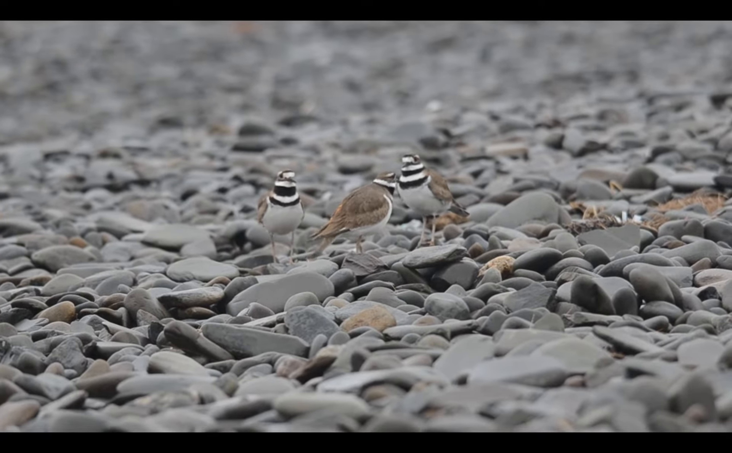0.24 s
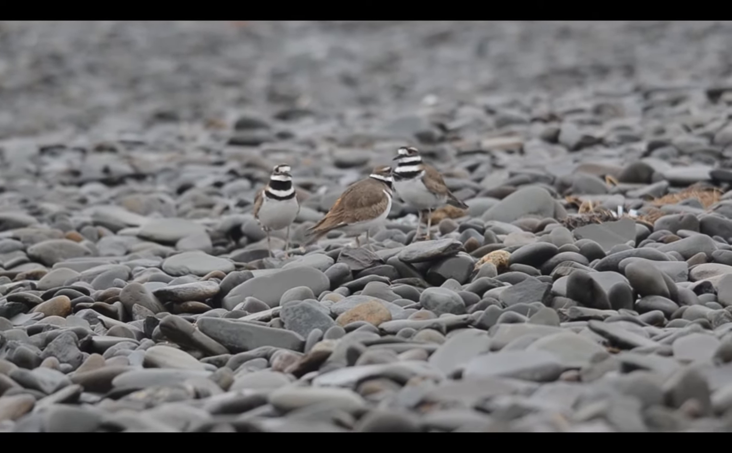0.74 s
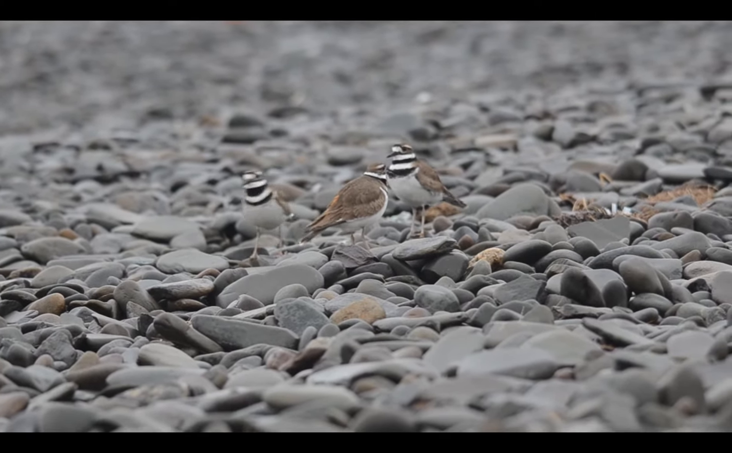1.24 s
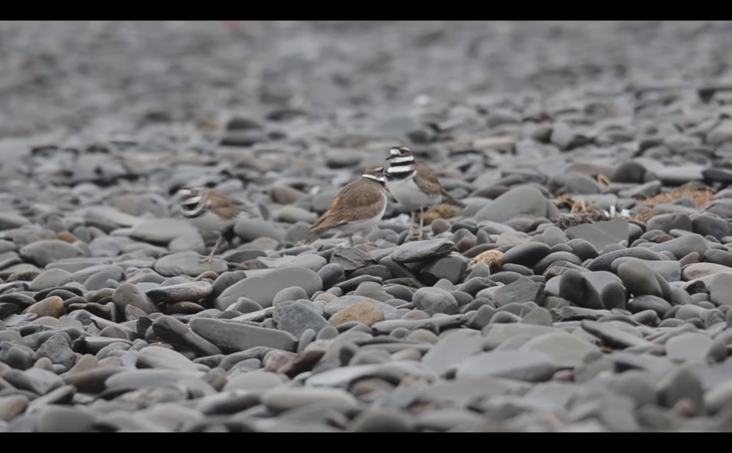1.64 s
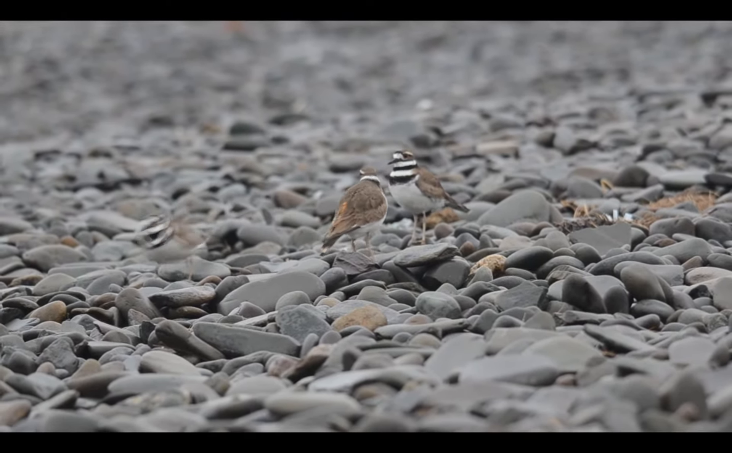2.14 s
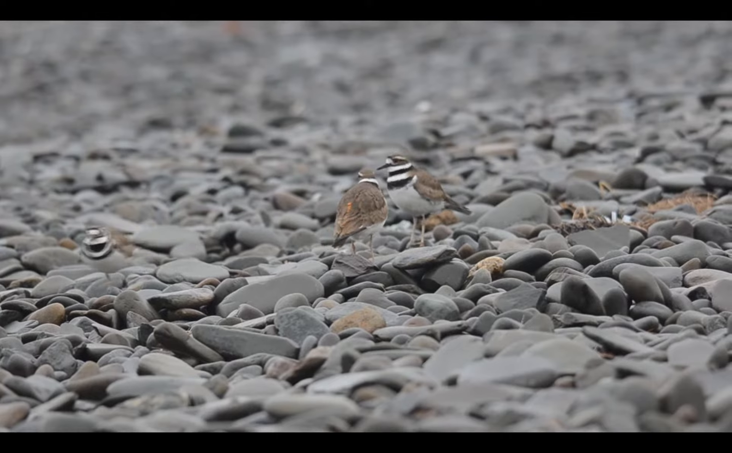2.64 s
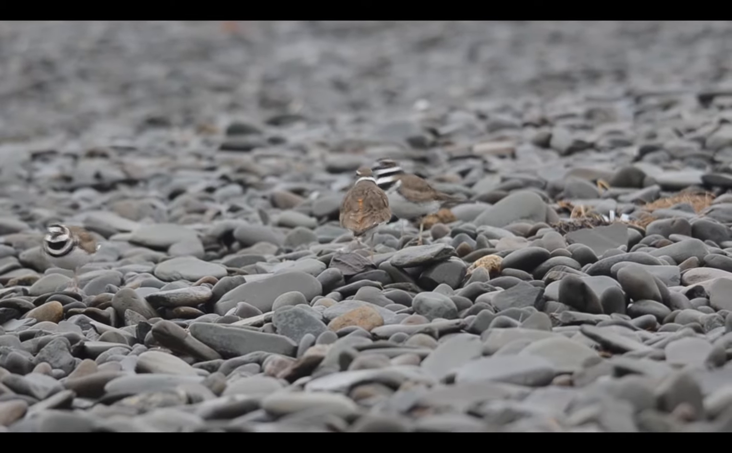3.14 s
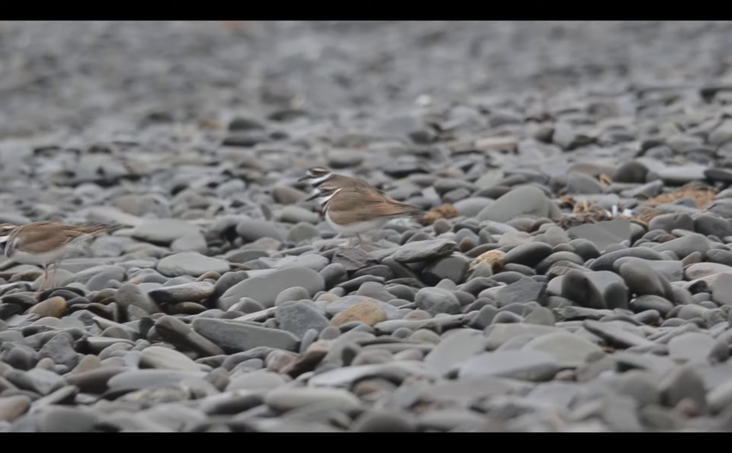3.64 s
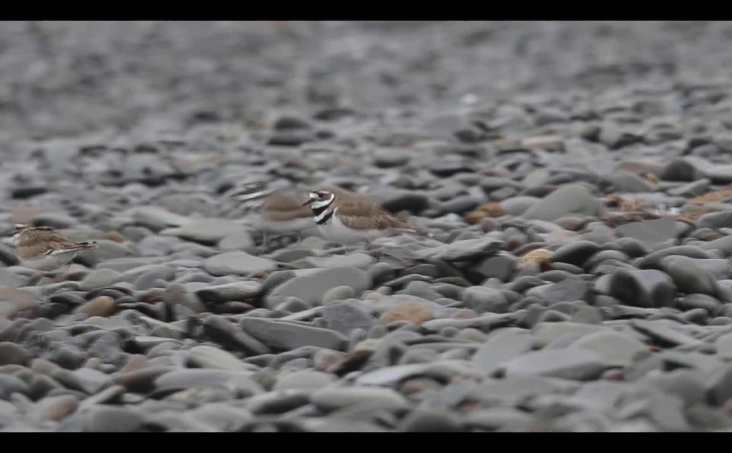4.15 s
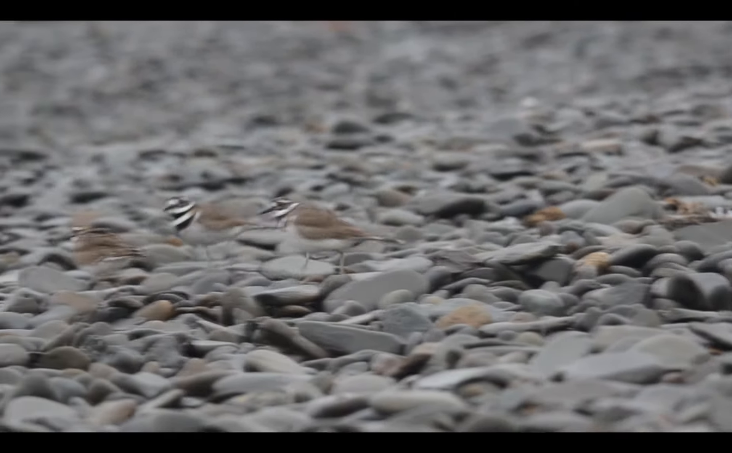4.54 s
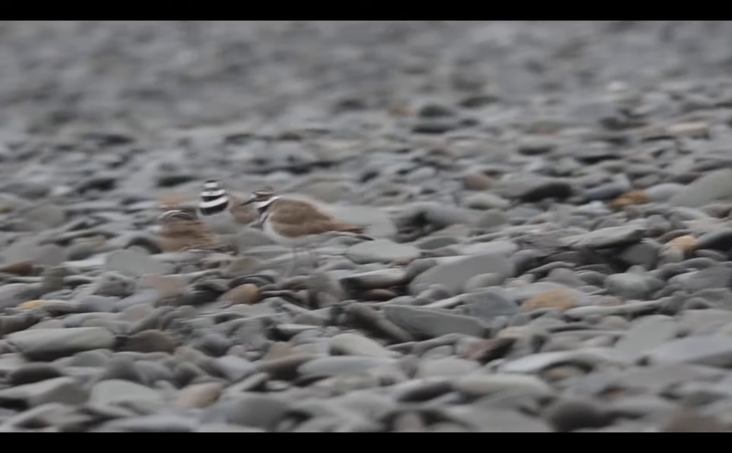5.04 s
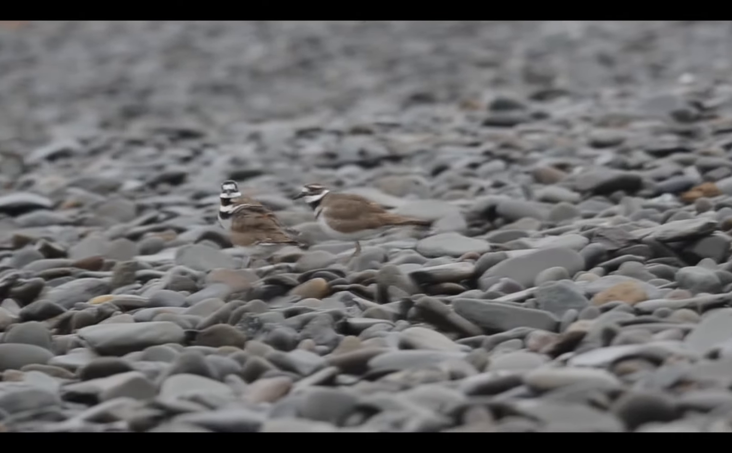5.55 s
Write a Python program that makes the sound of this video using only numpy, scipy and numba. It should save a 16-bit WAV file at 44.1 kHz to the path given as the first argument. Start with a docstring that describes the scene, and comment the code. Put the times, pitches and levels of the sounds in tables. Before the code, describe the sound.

Quick high peeps from several small shorebirds overlap in the open air of a stony beach, with almost no echo. A thin drawn whistle opens, and a few more follow among the short notes, which then settle into a busy, steady piping. Wind puffs and thumps right on the microphone, eases in the middle and returns more strongly. Distant surf hisses softly throughout.

```python
"""Plovers on a shingle beach

Three plovers pipe short arched notes over each other, and now and then a long drawn whistle.
The syrinx sounds its second partial loudest and at times falls into patterns of several cycles.
The stones scatter a short tail after each call. Right at the microphone gusts thump on the
diaphragm, and far off lies an even hiss of surf."""
import sys
import numpy as np
from scipy import signal
from scipy.io import wavfile
from scipy.ndimage import uniform_filter1d
from numba import njit

SR = 44100
rng = np.random.default_rng(int(sys.argv[2]) if len(sys.argv) > 2 else 0)


def to_wav(s):
    """Save 16-bit WAV."""
    ch = np.atleast_2d(s).T  # columns
    pcm = np.round(np.clip(ch, -1, 1) * 32767)  # PCM
    wavfile.write(sys.argv[1], SR, pcm.astype(np.int16))


N = 254898


def undb(db):
    """Decibels to gain."""
    return 10 ** (np.asarray(db) / 20)


def unit(x):
    """Scale to rms 1."""
    return x / np.sqrt(np.mean(x ** 2))


@njit
def moving_lowpass(x, hz, damping):
    """State-variable low-pass whose cutoff moves sample by sample."""
    out, band_state, low_state = np.empty(len(x)), 0., 0.
    for i in range(len(x)):
        g = np.tan(np.pi * hz[i] / SR)
        v = (band_state + g * (x[i] - low_state)) / (1 + g * (g + damping))
        out[i] = low_state + g * v
        band_state, low_state = 2 * v - band_state, low_state + 2 * g * v
    return out


def band(x, hz, width_hz):
    """Band-pass, gain 1 at the centre."""
    return signal.lfilter(*signal.iirpeak(hz, hz / width_hz, SR), x)


def spectrum_db(hz, table):
    """Level of a (frequency, level) table at hz, on a log frequency axis."""
    table_hz, table_db = np.transpose(table)
    return np.interp(np.log(hz), np.log(table_hz), table_db)


def walk(rate):
    """Random levels held 1 / rate s and slewed twice; spread near 1."""
    hold = int(SR / rate)
    steps = np.repeat(rng.standard_normal(N // hold + 1), hold)
    return 1.21 * uniform_filter1d(uniform_filter1d(steps, hold), hold)[:N]


def flutter(count, rough):
    """Gain of one line: steady at roughness 0, a quick random flutter that smears it at 1."""
    knots = rng.standard_normal(count // 60 + 2)
    noise = np.interp(np.arange(count) / 60, np.arange(len(knots)), knots)
    return np.sqrt(1 - rough ** 2) + rough * noise


def add(out, start_s, sound):
    """Mix a sound in at a time."""
    i = int(start_s * SR)
    out[i:i + len(sound)] += sound[:len(out) - i]


# the surf from far off: (frequency [Hz], relative level per Hz [dB])
SURF_SPECTRUM = [(15, -38), (25, 13.5), (183, -16.5), (253, 2), (322, -15), (482, 0), (582, -11),
                 (666, -14.5), (1050, -6), (2490, -15.5), (3530, -26), (6380, -29.5), (15500, -53.5)]


def surf(rms_db=-55.5):
    """Half-octave bands of distant wash that swell a little together and flicker alone."""
    out, swell = 0, walk(0.16)
    for hz in 25 * 2 ** np.arange(0, 9.4, .5):
        db = spectrum_db(hz, SURF_SPECTRUM) + 0.72 * swell + 1.34 * walk(5.2)
        wash = band(band(rng.standard_normal(N), hz, hz / 2), hz, hz / 2)
        out = out + undb(db) * wash
    return unit(out) * undb(rms_db)


# puffs on the microphone: (time of peak [s], breadth [s], level [dB])
GUSTS = [(0.057, 0.036, -39.5), (0.107, 0.028, -35), (0.248, 0.024, -49), (0.473, 0.01, -27),
         (0.496, 0.036, -34.5), (0.6, 0.024, -34), (0.655, 0.01, -34.5), (0.756, .021, -41.5),
         (0.811, .01, -36), (0.857, 0.014, -40), (0.893, 0.0077, -29.5), (1.035, 0.029, -34),
         (1.074, 0.013, -36.5), (1.15, 0.023, -41.5), (1.198, 0.018, -31.5), (1.449, 0.0055, -22.5),
         (1.526, .076, -33.5), (1.573, 0.032, -26), (1.634, .02, -31.5), (1.731, 0.027, -25),
         (1.793, .041, -30), (1.904, 0.026, -28), (2.054, 0.017, -38), (2.257, 0.082, -40.5),
         (2.487, 0.079, -46), (2.572, 0.026, -41.5), (3.233, 0.03, -47), (3.669, 0.018, -44.5),
         (3.913, 0.0075, -26), (3.979, 0.031, -20), (4.061, 0.022, -27), (4.105, 0.027, -25.5),
         (4.208, 0.031, -33), (4.379, 0.051, -40.5), (4.504, 0.02, -25), (4.545, 0.022, -27.5),
         (4.669, 0.056, -38.5), (4.755, 0.016, -38.5), (4.918, 0.022, -26.5), (4.976, 0.024, -32.5),
         (5.15, 0.027, -33), (5.236, 0.034, -29), (5.412, 0.041, -37.5), (5.526, 0.033, -33.5),
         (5.656, 0.068, -41)]
# the breeze under the puffs: (time [s], level [dB], brightness of the eddies [dB])
BREEZE = [(0, -49, -12.5), (.4, -63, -15.5), (.84, -47.5, -17.5), (1.1, -55, -13.5), (1.38, -54.5, -14.5),
          (1.57, -65, -1.5), (1.9, -61, -12.5), (2.6, -57.5, -11.5), (2.9, -67.5, -19), (3.3, -56, -18),
          (3.55, -66.5, -17.5), (3.85, -49.5, -18), (4.05, -56, -1.5), (4.35, -56, -17), (4.92, -60.5, -5),
          (5.1, -46.5, -18), (5.35, -43, -10), (5.78, -78, -25.5)]


def wind():
    """Eddies of uneven size push the diaphragm; in bright gusts they are smaller and reach higher."""
    t = np.arange(0, N / SR, .003)
    peak_s, breadth_s, gust_db = np.transpose(GUSTS)[:, :, None]
    gust_power = undb(2 * gust_db) * np.exp(-2 * ((t - peak_s) / breadth_s) ** 2)
    breeze_s, *columns = np.transpose(BREEZE)
    breeze_db, bright_db = (np.interp(t, breeze_s, c) for c in columns)
    power = gust_power.sum(axis=0) + undb(2 * breeze_db)
    bright_db = bright_db + .15 * (10 * np.log10(power) + 35)  # stronger puffs are brighter
    gain, bright_db = (np.interp(np.arange(N) / SR, t, c) for c in (np.sqrt(power), bright_db))
    gain = gain * undb(1.5 * walk(25))
    hz = np.clip(380 * undb(0.4292 * bright_db + 2.08 * walk(40)), 130, 620)
    # separate eddies, about one for each swing, over a weaker even flutter
    eddies = (rng.random(N) < hz / SR) * np.sqrt(SR / hz)
    push = rng.standard_normal(N) * (eddies + 0.31) * undb(2.0 * walk(60))
    rumble = moving_lowpass(push, hz, damping=1.0)
    rumble = moving_lowpass(rumble, 1.37 * hz, damping=1.77) / np.sqrt(hz)
    rumble = signal.sosfilt(signal.butter(2, 95, "high", fs=SR, output="sos"), rumble)
    # the eddies vary within a puff, while the puff sets their summed strength
    rumble = rumble / (uniform_filter1d(rumble ** 2, size=3000) + 1e-12) ** .4
    return .22 * np.tanh(unit(rumble) * gain / .22)  # the diaphragm stiffens against hard swings


# single hard eddies on the microphone: (time [s], signed peak push [full scale])
THUMPS = [(0.4746, -0.026), (1.0373, -0.064), (1.4497, -0.087), (1.5528, -0.15), (1.5754, 0.11),
          (1.7116, -0.083), (1.7384, 0.17), (1.8249, -0.097), (3.9571, -0.35), (3.9882, -0.19),
          (3.9951, 0.18), (4.1061, 0.06), (4.5007, -0.14), (4.918, -0.22), (5.2467, 0.0034)]


def thumps(base_hz=340, hz_per_push=260):
    """Each eddy is a pointed push with a counter-swing on both sides; harder ones swing faster."""
    out, t = np.zeros(N), np.arange(-.012, .012, 1 / SR)
    for s, push in THUMPS:
        swings = (base_hz + hz_per_push * abs(push)) * t
        envelope = np.exp(-(0.87 * swings) ** 2) / (1 + (4 * swings) ** 2) ** 0.76
        add(out, s + t[0], push * envelope * np.cos(2 * np.pi * 0.94 * swings))
    return out


def shingle(calls, t60_s=.07, tail_db=-20.5):
    """The stones of the beach scatter a short dull tail after each call."""
    t = np.arange(int(.08 * SR)) / SR
    tail = rng.standard_normal(len(t)) * np.exp(-np.log(1000) * t / t60_s) * (t > .002)
    scattered = signal.fftconvolve(calls, tail / np.sqrt(np.sum(tail ** 2)))[:N]
    return calls + undb(tail_db) * band(scattered, hz=4300, width_hz=4100)


# partials five to eight: (level against upper_db [dB])
UPPER_PARTIALS_DB = [-27, -28, -30.5, -37]
# lines of a two-cycle pattern, at partials 0.5, 1.5 and so on: (relative level [dB])
TWO_CYCLE_DB = [-17, -1, 7.5, -5, -20, -36, -33]
# colour of the lines of a longer pattern: (frequency [Hz], relative level [dB])
LONG_PATTERN_SPECTRUM = [(450, -16), (1000, -34), (2600, -28), (3050, -0.5), (3500, -6.5), (4000, -5.5),
                         (4900, -12), (5600, -4), (6100, -10), (7000, -29), (7800, -8), (8300, -18.5),
                         (9200, -25), (12000, -36.5), (15000, -47.5)]


def syrinx(hz, first_db, third_db, fourth_db, upper_db, patterns):
    """Partials of a membrane at hz / 2; each (cycles, gain, roughness) pattern adds lines between."""
    phase = np.pi * np.cumsum(hz) / SR
    out = undb(first_db) * np.sin(phase) + np.sin(2 * phase)
    out += undb(third_db) * np.cos(3 * phase) + undb(fourth_db) * np.cos(4 * phase)
    for k, db in enumerate(UPPER_PARTIALS_DB, start=5):
        partial_hz = k * hz / 2
        rolloff_db = 2.5 * np.maximum(partial_hz - 13500, 0) / 1000
        gain = undb(upper_db + db - rolloff_db) * (partial_hz < .45 * SR)
        out += gain * np.sin(k * phase) * flutter(len(hz), 0.5)
    for cycles, gain, rough in patterns:
        for k in range(1, 7 * cycles):
            if k % cycles == 0:
                continue
            line_hz = hz / 2 * k / cycles
            db = TWO_CYCLE_DB[k // 2] if cycles == 2 else spectrum_db(line_hz, LONG_PATTERN_SPECTRUM)
            out += gain * undb(db) * np.sin(phase * k / cycles + k * k) * flutter(len(hz), rough)
    return out


# long calls across the beach, one list each: (time [s], second partial [Hz], level [dB])
WHISTLES = [
    [(0.004, 4090, -74), (0.02, 4444, -29), (0.06, 4370, -31), (0.11, 4350, -26.5), (0.14, 4250, -25.5),
     (0.2, 4273, -22), (0.24, 4233, -24.5), (0.262, 4314, -22.5), (0.272, 4450, -67)],
    [(1.752, 4580, -35), (1.765, 4740, -27.5), (1.79, 4470, -34.5), (1.82, 4340, -27), (1.86, 4310, -25.5),
     (1.9, 4390, -21), (1.94, 4274, -22.5), (1.965, 4298, -20.5), (1.98, 4446, -23), (1.988, 4610, -77)],
    [(2.53, 4340, -44), (2.54, 4180, -38), (2.56, 3940, -35.5), (2.59, 3830, -40), (2.615, 3870, -36),
     (2.632, 4060, -54)],
    [(3.295, 4540, -33), (3.302, 4804, -17), (3.314, 4894, -20.5), (3.33, 4540, -28), (3.355, 4175, -27.5),
     (3.39, 4250, -25.5), (3.44, 4295, -24), (3.5, 4400, -20.5), (3.55, 4433, -21), (3.58, 4486, -20.5),
     (3.592, 4620, -33.5)],
    [(3.594, 4430, -33), (3.604, 4370, -39), (3.62, 4110, -40), (3.66, 4220, -37), (3.7, 4248, -30.5),
     (3.74, 4304, -30.5), (3.755, 4570, -57)],
]
# stretches where a whistle's vibration repeats only after several cycles:
# (start [s], end [s], pattern, relative level at start [dB], at end [dB], roughness [0-1])
WHISTLE_PATTERNS = [(.13, 0.202, "two", -48, -42.5, .6), (0.194, 0.263, "two", -26.5, -22.5, 0.03),
                    (1.825, 1.934, "five", -22.5, -28.5, 0.15), (1.926, 1.985, "two", -26.5, -28.5, 0.1),
                    (3.351, 3.546, "five", -17.5, -28.5, 0.38), (3.518, 3.585, "two", -26.5, -26, 0.3),
                    (3.52, 3.607, "nine", -35.5, -19, 0.8)]
# period of each pattern: (length [cycles])
PATTERN_CYCLES = {"two": 2, "five": 5, "nine": 9}


def whistles(upper_db=-24.5):
    """Long calls that glide, hold their pitch and slip in and out of their patterns."""
    out, waver = np.zeros(N), walk(90)
    for rows in WHISTLES:
        s, *columns = np.transpose(rows)
        t = np.arange(s[0], s[-1], 1 / SR)
        hz, db = (uniform_filter1d(np.interp(t, s, c), size=200) for c in columns)
        # the windpipe passes the lowest partial less as the pitch rises
        first_db = np.maximum(-17 - 0.035 * (hz - 4000), -31)
        # the next partials follow pitch and level; the third dips in fast glides
        higher_hz, louder_db = hz - 4250, np.clip(db + 27, -15, 10)
        glide_hz_per_ms = np.minimum(np.abs(np.gradient(hz)) * SR / 1000, 20)
        third_db = -19.5 + 0.52 * higher_hz / 100 + 0.34 * louder_db - 0.4 * glide_hz_per_ms
        fourth_db = -24 + 0.083 * higher_hz / 100 - 0.8 * louder_db
        patterns = []
        for start, end, name, start_db, end_db, rough in WHISTLE_PATTERNS:
            if s[0] < start < s[-1]:
                gain = undb(np.interp(t, [start, end], [start_db, end_db]))
                gate = np.clip(np.minimum(t - start, end - t) / 0.012, 0, 1)
                patterns.append((PATTERN_CYCLES[name], gain * gate, rough))
        wobble = waver[int(s[0] * SR):][:len(t)]
        edges = np.clip(np.minimum(t - s[0], s[-1] - t) / 0.0013, 0, 1)
        voice = syrinx(hz + 14 * wobble, first_db, third_db, fourth_db, upper_db, patterns)
        add(out, s[0], voice * edges * undb(db + 0.97 * wobble))
    return out


# kinds of note: (usual top [Hz], usual end [Hz], higher top kept at the end [share],
# fall done at two thirds [share], fade [dB], third partial [dB], its gain with rise [dB per 100 Hz],
# fourth partial [dB], pattern level [dB])
NOTE_KINDS = {"arch": (4077.5, 3705, 0.31, 0.62, -2.5, -14, 1.47, -12.5, -25),
              "pip": (3925, 3730, 0.8, .5, -2, -13.5, 1, -18, -80),
              "low": (3678, 3588.5, 0.43, 0.84, -1, -20.5, 2, -16, -43.5),
              "faint": (3943.5, 3741.5, 0.4, 0.82, -8, -37.5, 3.5, -16.5, -80),
              "rising": (4400, 4581, 0.23, 0.8, 4, -39.5, 11, -19.5, -25)}
# the arching bird turns its beak to and from the microphone: (time [s], gain of partials 4-8 [dB])
BEAK_FACING = [(2.1, 3.5), (2.7, -0.5), (3.0, -1), (3.8, -3.5), (4.4, -8), (4.9, -3), (5.78, -3)]
# short notes of the birds on the shingle:
# (time [s], length [s], kind, second partial at the start [Hz], at the top of the arch [Hz], level [dB])
NOTES = [(0.002, 0.041, "faint", 4280, 4060, -33), (0.163, 0.033, "low", 3730, 3770, -38),
         (0.272, 0.041, "faint", 4050, 3800, -48), (0.357, 0.025, "low", 3680, 3590, -42.5),
         (0.492, 0.035, "pip", 3900, 3990, -26.5), (0.531, 0.029, "low", 3700, 3610, -41.5),
         (0.544, 0.059, "faint", 3870, 4080, -37.5), (0.692, 0.04, "pip", 3920, 3977, -29.5),
         (0.704, 0.028, "low", 3640, 3670, -40.5), (0.851, 0.041, "faint", 3920, 3920, -39.5),
         (0.854, 0.042, "low", 3680, 3690, -39.5), (0.913, 0.035, "pip", 3900, 3922, -28.5),
         (1.037, 0.04, "low", 3670, 3615, -38), (1.079, 0.037, "pip", 3870, 3830, -29.5),
         (1.161, .061, "faint", 3900, 3916, -41.5), (1.243, 0.044, "low", 3630, 3680, -39),
         (1.266, 0.038, "pip", 3910, 3755, -34.5), (1.45, 0.035, "low", 3720, 3710, -43),
         (1.476, 0.038, "pip", 3880, 3960, -29), (1.655, 0.024, "rising", 4410, 4506, -34),
         (1.68, 0.029, "low", 3620, 3650, -41), (1.771, 0.06, "faint", 3896, 3880, -43.5),
         (1.884, .033, "low", 3620, 3760, -36.5), (2.072, 0.064, "faint", 3820, 3920, -40.5),
         (2.079, 0.026, "low", 3880, 3445, -40.5), (2.18, 0.05, "arch", 3930, 4093, -29),
         (2.261, 0.05, "arch", 3808, 3926, -30.5), (2.274, 0.027, "low", 3620, 3600, -35.5),
         (2.374, 0.056, "faint", 3900, 3870, -44.5), (2.469, 0.04, "arch", 3946, 4084, -29),
         (2.642, 0.048, "arch", 3980, 4215, -27.5), (2.687, 0.06, "faint", 3890, 3900, -41.5),
         (2.783, 0.054, "arch", 3870, 4154, -27.5), (2.797, 0.039, "low", 3730, 3820, -35.5),
         (2.938, 0.067, "arch", 3910, 4110, -28.5), (2.975, 0.041, "low", 3740, 3770, -33),
         (3.011, 0.072, "faint", 3730, 4135, -38.5), (3.165, 0.052, "rising", 4040, 4300, -25),
         (3.213, 0.043, "low", 3520, 3750, -33.5), (3.288, 0.059, "faint", 3900, 3790, -43.5),
         (3.389, 0.039, "low", 3480, 3715, -29), (3.559, 0.041, "low", 3410, 3730, -32.5),
         (3.767, 0.05, "low", 3560, 3786, -30), (3.78, 0.049, "arch", 3850, 4363, -27.5),
         (3.893, 0.054, "arch", 3800, 4164, -29), (3.929, 0.041, "faint", 4190, 3990, -38),
         (3.967, 0.044, "low", 3664, 3810, -29.5), (4.078, 0.048, "arch", 3830, 4236, -29),
         (4.136, 0.067, "faint", 3900, 4202, -38), (4.176, 0.053, "low", 3720, 3830, -30.5),
         (4.222, 0.051, "arch", 3760, 4120, -28.5), (4.368, 0.049, "arch", 3856, 4160, -29),
         (4.389, 0.064, "faint", 4150, 4120, -34.5), (4.411, 0.036, "low", 3710, 3707, -34.5),
         (4.518, 0.049, "arch", 3910, 4130, -29.5), (4.621, 0.029, "low", 3680, 3670, -38),
         (4.665, 0.059, "faint", 3810, 4054, -37.5), (4.691, 0.051, "arch", 3860, 4040, -29.5),
         (4.83, .028, "low", 3680, 3466, -35), (4.914, .04, "arch", 3690, 3985, -26),
         (4.949, 0.063, "faint", 3870, 3970, -37.5), (5.023, 0.031, "low", 3573, 3555, -36.5),
         (5.047, 0.057, "arch", 3630, 4084, -29.5), (5.112, 0.064, "faint", 3930, 3885, -40),
         (5.186, 0.052, "arch", 3710, 4056, -28.5), (5.238, 0.035, "low", 3740, 3660, -35),
         (5.318, 0.061, "arch", 3790, 4095, -28.5), (5.352, 0.085, "faint", 4104, 4090, -31.5),
         (5.429, 0.031, "pip", 3780, 3795, -30.5), (5.454, 0.055, "arch", 3720, 4067, -29.5),
         (5.58, 0.058, "arch", 3790, 4080, -29), (5.649, 0.045, "low", 3514, 3650, -34),
         (5.666, .051, "faint", 3830, 3800, -42), (5.71, 0.056, "arch", 3750, 4020, -29.5)]


def piping(strong_rise_hz=125):
    """Each note starts at once, arches in pitch and dies; loud ones follow a tick of the opening beak."""
    out, waver, quiver = np.zeros(N), walk(150), walk(400)
    for s, length, kind, start_hz, top_hz, level_db in NOTES:
        (usual_top_hz, end_hz, kept, fallen, fade_db,
         third_db, rise_db, fourth_db, pattern_db) = NOTE_KINDS[kind]
        onset, t = int(s * SR), np.arange(int((length + 0.0036) * SR)) / SR
        progress = t / length
        rise_hz = max(top_hz - start_hz, 0)
        fall_hz = top_hz - end_hz - kept * (top_hz - usual_top_hz)
        arch_hz = [start_hz, top_hz, top_hz - fallen * fall_hz, top_hz - fall_hz]
        hz = np.polyval(np.polyfit(np.arange(4) / 3, arch_hz, 3), np.minimum(progress, 1))
        hz += 15 * np.resize(quiver[onset:], len(t))
        db = level_db + fade_db * np.clip((progress - .25) / 0.6, -.2, 2.)
        db += 1.8 * np.resize(waver[onset:], len(t))
        attack = np.clip(t / 0.0014, 0, 1) * np.clip(0.61 + t / 0.031, 0, 1)
        release = np.clip((t[-1] - t) / 0.019, 0, 1)
        # the first and third partials need the full swing of the middle of the note
        swing = np.clip(t / 0.0075, .02, 1) * np.clip((1.05 - progress) / 0.53, .03, 1)
        first_db = -20 - 0.013 * (hz - 4000) + 10 * np.log10(swing)
        third_db += rise_db * rise_hz / 100 + 20 * np.log10(swing)
        if kind == "arch":
            fourth_db += np.interp(s, *np.transpose(BEAK_FACING))
        upper_db = fourth_db + (3.3 if kind == "rising" else 0)
        patterns = []
        if rise_hz > strong_rise_hz and pattern_db > -60:
            # a strong effort breaks into patterns around the top of the arch
            effort = np.exp(-((progress - .38) / 0.27) ** 2)
            patterns = [(2, undb(pattern_db + 2) * effort, 0.54),
                        (5, undb(pattern_db - 1) * effort ** 2, 0.94)]
        voice = syrinx(hz, first_db, third_db, fourth_db, upper_db, patterns)
        add(out, s, voice * attack * release * undb(db))
        if level_db > -32 and s > .1:
            beak_tick = np.exp(-t / 0.00012) * np.sin(2 * np.pi * 3500 * t)
            add(out, s - .012, undb(level_db - 17) * beak_tick)
    return out


def scene():
    """Birds over the stones, wind on the microphone and surf far off, in mono."""
    return (shingle(piping() + whistles()) + wind() + thumps() + surf())[None]


# cancellations in the housing around the microphone: (frequency [Hz], width [Hz], depth [0-1])
HOUSING_NOTCHES = [(5735, 540, 0.98), (6870, 210, 0.8)]


def record(dry):
    """The microphone's housing cancels two narrow bands, and the top is cut."""
    x, cutoff_hz = dry[0], 15680
    for hz, width_hz, depth in HOUSING_NOTCHES:
        x = x - depth * band(x, hz, width_hz)
    return signal.sosfilt(signal.ellip(8, .2, 70, cutoff_hz, fs=SR, output="sos"), x)[None]


dry = scene()
out = record(dry)
to_wav(out)
```